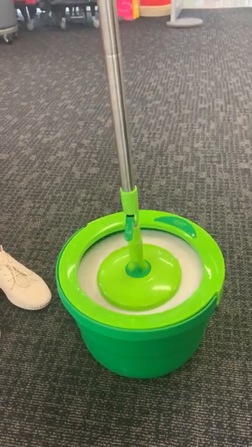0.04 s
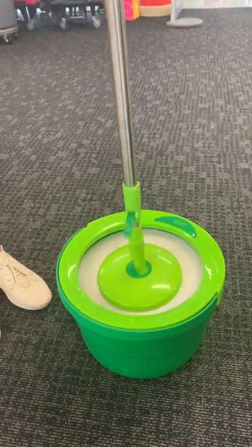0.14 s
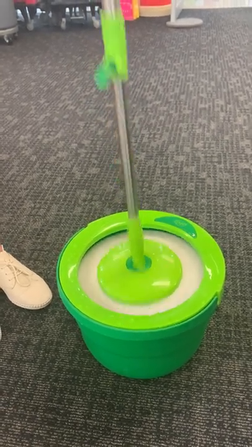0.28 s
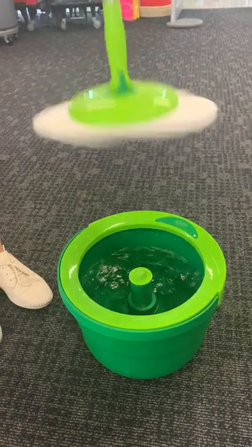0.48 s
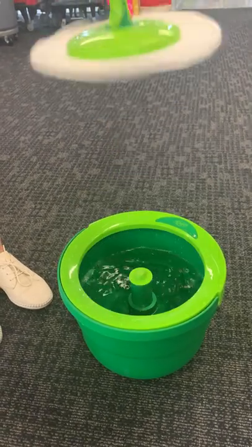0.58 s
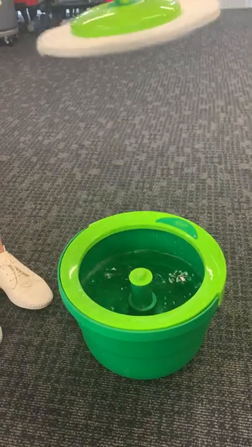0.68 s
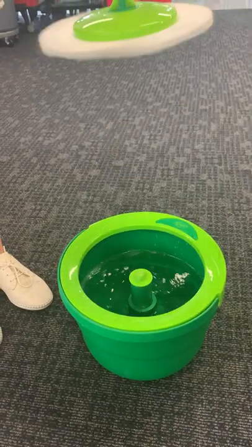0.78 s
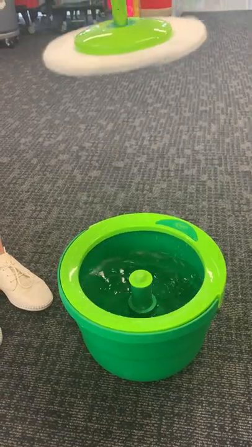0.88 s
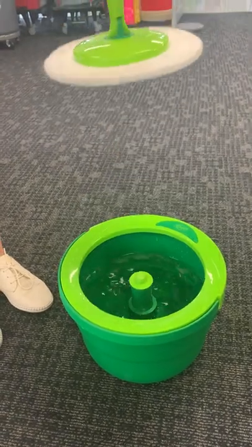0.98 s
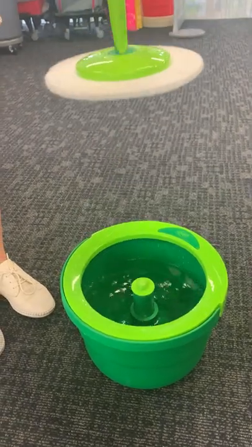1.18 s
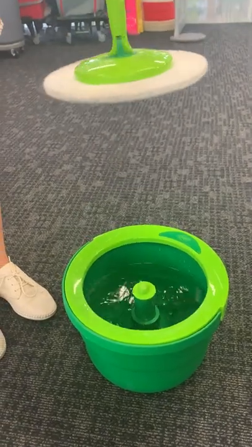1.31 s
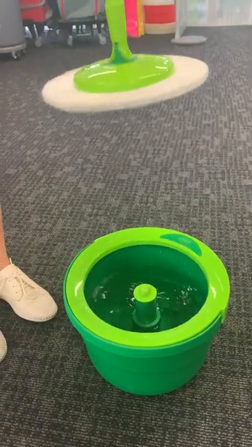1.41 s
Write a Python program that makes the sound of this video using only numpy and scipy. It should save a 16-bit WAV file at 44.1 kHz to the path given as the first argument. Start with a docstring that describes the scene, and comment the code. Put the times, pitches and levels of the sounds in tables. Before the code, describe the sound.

Spin mop whirring and churning water, with one sharp handle clack and faint dripping afterwards.

```python
"""A carpeted room, a pair of microphones close in front of a plastic bucket of water.
A spin mop is drawn up: its head whirs and churns the water while the telescopic handle slides out,
rubbing and rattling, and hits its stop with a sharp clack. The head leaves its post with a thud,
whirs on and drips into the bucket. Further off, the raised handle knocks a few times.
The room hums low throughout."""
import sys
import numpy as np
from scipy import signal
from scipy.fft import rfft, irfft, next_fast_len
from scipy.io import wavfile

SR = 44100
rng = np.random.default_rng(int(sys.argv[2]) if len(sys.argv) > 2 else 0)


def dump_mix(stems):
    """Bounce the given channels to the path in sys.argv[1] as a 16-bit WAV at rate SR."""
    frames = np.atleast_2d(stems).T  # one column per channel
    limited = np.clip(frames, -1, 1)  # hard clip at full scale
    pcm = np.round(limited * 32767).astype(np.int16)
    wavfile.write(sys.argv[1], SR, pcm)


N = 63945
TIME = np.arange(N) / SR
SIZE = next_fast_len(2 * N)
FREQS = np.maximum(np.arange(SIZE // 2 + 1) * SR / SIZE, 1)


def from_db(db):
    """Decibels to gain."""
    return 10 ** (np.asarray(db) / 20)


def at_hz(points, hz):
    """Read a curve on a log-frequency axis."""
    freqs, values = np.transpose(points)
    return np.interp(np.log(hz), np.log(freqs), values)


def level(curve):
    """Gain over time from (time [s], level [dB]) points."""
    return from_db(np.interp(TIME, *np.transpose(curve)))


def drift(rate_hz):
    """Random wander with a spread of 1, mostly slower than rate_hz."""
    slow = irfft(rfft(rng.standard_normal(SIZE)) / (1 + (FREQS / rate_hz) ** 2), SIZE)
    return slow[:N] / slow.std()


def colour(x, spectrum):
    """Causal (minimum-phase) filter with the given gains."""
    cepstrum = irfft(np.log(from_db(at_hz(spectrum, FREQS))), SIZE)
    cepstrum[1:SIZE // 2] *= 2
    cepstrum[SIZE // 2 + 1:] = 0
    return irfft(rfft(x, SIZE) * np.exp(rfft(cepstrum)), SIZE)[:N]


def bursts(times, dbs, decay_s, rise_s=1 / SR):
    """Each contact is a fast-dying burst of micro-impacts; a glancing one swells first."""
    ages = [np.maximum(TIME - at, 0) for at in times]
    power = sum((from_db(db) * (1 - np.exp(-age / rise_s)) * np.exp(-age / decay_s)) ** 2
                for age, db in zip(ages, dbs))
    return np.sqrt(power) * rng.choice([-1, 1], N)


def strike(times, dbs, modes, vary_db=0):
    """Blows set the modes ringing, varied by vary_db; nothing radiates far below the lowest."""
    ring = np.zeros(N)
    for at, db in zip(times, dbs):
        age = np.maximum(TIME - at, 0)
        for (hz, mode_db, t60), chance in zip(modes, rng.standard_normal(len(modes))):
            envelope = from_db(db + mode_db + vary_db * chance) * np.exp(-np.log(1000) * age / t60)
            ring += envelope * np.sin(2 * np.pi * hz * age)
    low_cut = signal.butter(3, .75 * modes[0][0], "high", fs=SR, output="sos")
    return signal.sosfilt(low_cut, ring + 1e-18)


# Hum of the room: (frequency [Hz], level [dB])
HUM_TONES = [(65.8, -46.5), (132, -60)]
# Air all round the microphones: (frequency [Hz], gain [dB])
AIR_SPECTRUM = [(20, -45), (45, -34), (70, -27), (110, -33), (200, -44), (380, -60.5), (800, -49.5),
                (1300, -60), (3000, -65.5), (8000, -66.5), (15000, -99)]

def room_tone():
    """A low wavering hum from the front, over the diffuse air of the room."""
    hum = sum(from_db(db + 1.3 * drift(2)) * np.sin(2 * np.pi * hz * TIME + .16 * drift(4))
              for hz, db in HUM_TONES)
    return microphones(hum) + room(colour(rng.standard_normal(N), AIR_SPECTRUM))


# Close hiss of the sliding handle, then of the spinning head: (time [s], level [dB])
WHIR_LEVELS = [(0, -9), (.06, -9.5), (.11, -11), (.155, 0.5), (.19, 2.5), (.22, -2.5), (.29, -2.5),
               (.33, -22), (.38, -29), (.41, -4), (.44, -13.5), (.56, -18.5), (.74, -18), (.85, -21.5),
               (.95, -20.5), (1.0, -22), (1.09, -17.5), (1.15, -34), (1.19, -17), (1.23, -25.5),
               (1.3, -24.5), (1.33, -35), (1.365, -17), (1.4, -33), (1.45, -33)]
# Tone of that hiss: (frequency [Hz], gain [dB])
WHIR_SPECTRUM = [(100, -63), (420, -35.5), (1400, -31.5), (2200, -42.5), (3500, -37.5), (5200, -32.5),
                 (6500, -34.5), (8300, -27.5), (11000, -37.5), (15000, -36)]

def whir(mean_flutter_hz=21.8, flutter_db=1.8, grain_db=2):
    """Grainy friction hiss that flutters unevenly as the head turns."""
    turn = np.sin(2 * np.pi * np.cumsum(mean_flutter_hz * (1 + drift(2.8))) / SR)
    friction = rng.standard_normal(N) * from_db(flutter_db * turn + grain_db * drift(250) - 3.5)
    return colour(friction * level(WHIR_LEVELS), WHIR_SPECTRUM)


# Water stirred just in front of the microphones: (time [s], level [dB])
CHURN_LEVELS = [(0, 9.5), (.11, -4), (.22, -2), (.3, 2.5), (.38, -6), (.42, -3), (.49, -13), (.6, -19),
                (.95, -52), (1.45, -28.5)]
# Tone of the slosh: (frequency [Hz], gain [dB])
CHURN_SPECTRUM = [(40, -40), (100, -16.5), (200, -28), (350, -25.5), (520, -31.5), (780, -32), (1300, -36),
                  (2200, -38.5), (5000, -47.5)]

def churn():
    """Lumpy slosh of the stirred water, settling once the head is out."""
    slosh = rng.standard_normal(N) * level(CHURN_LEVELS)
    lumps = from_db(2.9 * drift(50) - 2)
    return colour(slosh * lumps, CHURN_SPECTRUM)


# Modes of the handle's tubes: (frequency [Hz], level [dB], t60 [s])
TUBE_RING = [(360, -41, 0.03), (758, -49, 0.03), (1230, -38, 0.03), (1350, -35, 0.03), (3194, -53, 0.04)]

def rub(swell_db=21, swell_s=.0091):
    """The sliding tubes keep their modes humming, scraping harder just before the stop."""
    until_stop = np.maximum(STOP_HITS[0][0] - TIME, 0)
    pressure = (until_stop > 0) * (1 + from_db(swell_db) * np.exp(-until_stop / swell_s))
    friction = pressure * rng.standard_normal(N)
    return from_db(-31.5) * signal.fftconvolve(friction, strike([0], [0], TUBE_RING))[:N]


# Loose tubes touching, close up: (time [s], level [dB], tick level [dB])
TUBE_CONTACTS = [(.002, 6, -35), (.008, 6.5, -29), (0.035, -7.5, -28), (.066, -3.5, 2), (0.093, 3, -9),
                 (0.134, 4.5, -27), (0.147, 3.5, -23), (0.179, -2.5, -18), (0.193, -3.5, -4),
                 (.329, -8, -41), (.347, 0, -22), (0.3969, -1.5, -21), (0.4047, -2, 5.5), (.406, 6, -1),
                 (0.672, -26.5, -16)]
# Their dull rasp: (frequency [Hz], gain [dB])
RASP_SPECTRUM = [(100, -13), (330, -18.5), (600, -37), (1000, -21.5), (1320, -18), (1750, -22),
                 (3500, -29.5), (6000, -34.5), (15000, -60.5)]
# Bright tick of a contact on the handle: (frequency [Hz], gain [dB])
TICK_SPECTRUM = [(500, -49), (3500, -21.5), (5000, -30), (7500, -25.5), (10000, -33), (15000, -36.5)]

def rattles(rise_s=.002):
    """The tubes graze each other: a short ring, a dull rasp and a bright tick."""
    times, dbs, tick_dbs = np.transpose(TUBE_CONTACTS)
    ring = strike(times + rise_s, dbs, TUBE_RING, vary_db=-2)
    rasp = colour(bursts(times, dbs, decay_s=.0033, rise_s=rise_s), RASP_SPECTRUM)
    tick = colour(bursts(times, tick_dbs, decay_s=.001), TICK_SPECTRUM)
    return ring + rasp + tick


def along_tube(x, travel_at_1khz_s=.0016):
    """Bending waves run down the tube, the treble arriving before the bass."""
    phase = 4 * np.pi * travel_at_1khz_s * np.sqrt(1000 * FREQS)
    return irfft(rfft(x, SIZE) * np.exp(-1j * phase), SIZE)[:N]


# The handle's hit and rebound at its stop, close up: (time [s], level [dB])
STOP_HITS = [(.249, -0.5), (0.254, -4.5)]
# Crack of each hit: (frequency [Hz], gain [dB])
CRACK_SPECTRUM = [(130, -32.5), (400, 5.5), (750, -0.5), (1500, -0.5), (3300, 3.5), (4700, -2.5),
                  (6500, -3.5), (9000, -5.5), (11500, -7), (15000, -14.5)]
# Modes of the whole mop: (frequency [Hz], level [dB], t60 [s])
MOP_RING = [(330, -4.5, 0.04), (537, -5.5, 0.046), (790, -15, 0.04), (1415, -23, 0.06), (1980, -22, 0.046),
            (2220, -20, 0.06), (2810, -22, .04)]

def clack(body_lag_s=.0022):
    """The handle hits its stop and the mop rings; hit and rebound each send a crack down the tube."""
    times, dbs = np.transpose(STOP_HITS)
    body = strike(times[:1] + body_lag_s, dbs[:1], MOP_RING, vary_db=.8)
    cracks = colour(bursts(times, dbs, decay_s=.0025), CRACK_SPECTRUM)
    return body + along_tube(cracks)


# The head bumps the bucket on its way out, close up: (time [s], level [dB])
BUCKET_BUMPS = [(0.2779, 0.5), (0.2863, -10), (.301, -8.5), (0.409, -25.5)]
# Modes of the bucket: (frequency [Hz], level [dB], t60 [s])
BUCKET_RING = [(108, -18, 0.096), (163, -17.5, 0.046), (261, -26.5, 0.088)]

def thud():
    """The bucket booms briefly as the head leaves its post."""
    times, dbs = np.transpose(BUCKET_BUMPS)
    return strike(times, dbs, BUCKET_RING, vary_db=.8)


def bubble(at, db, hz, decay_s, rise_per_s=3.46):
    """An air bubble rings and rises in pitch."""
    age = np.maximum(TIME - at, 0)
    envelope = from_db(db) * (1 - np.exp(-age * hz)) * np.exp(-age / decay_s)
    return envelope * np.sin(2 * np.pi * hz * age * (1 + rise_per_s * age / 2))


# Plops near the microphones; the first rings out with the handle's rattle, the rest fall in the bucket: (time
# [s], level [dB], pitch [Hz])
WATER_PLOPS = [(.349, -27, 787), (.513, -33.5, 723), (.535, -34, 732), (.594, -36.5, 690),
               (.655, -42.5, 730), (.868, -44.5, 822), (1.255, -47, 772)]
# Splash of each plop: (frequency [Hz], gain [dB])
SPLASH_SPECTRUM = [(300, -22), (780, -12), (1100, -9), (1700, -14), (3000, -20)]

def drips(head_out_s=.47, drips_per_s=90, drain_db_per_s=7, plop_decay_s=.00454):
    """A few splashy plops among small random drips from the lifted head, fading as it drains."""
    gaps, pitches, faintness = rng.random((300, 3)).T
    drained_s = np.cumsum(-np.log(gaps)) / drips_per_s
    drip_dbs = -49 - 20 * faintness - drain_db_per_s * drained_s
    drip_hz = 720 * 2 ** (1.5 * pitches ** 2)  # 1.5 octaves, favouring the low end
    small = sum(bubble(at, db, hz, decay_s=2.5 / hz)
                for at, db, hz in zip(head_out_s + drained_s, drip_dbs, drip_hz) if at < TIME[-1])
    times, dbs, _ = np.transpose(WATER_PLOPS)
    splash = colour(bursts(times, dbs - 6, 2 * plop_decay_s), SPLASH_SPECTRUM)
    plops = sum(bubble(at, db, hz, plop_decay_s) for at, db, hz in WATER_PLOPS)
    return small + splash + plops


# The raised handle knocks, further from the microphones:
# (time [s], level [dB], decay [s], brightness [dB], ring level [dB], pitch [ratio])
HANDLE_KNOCKS = [(.405, 0, 0.005, -19, 2, 1), (1.0119, -4, 0.0089, -8.5, -14, 0.83),
                 (1.019, -6, 0.0036, 4.5, -1.5, 1), (1.115, -12, 0.0089, -21, -12.5, .9),
                 (1.357, -14.5, 0.007, -9, -19, 0.85)]
# Dull part of a knock: (frequency [Hz], gain [dB])
KNOCK_SPECTRUM = [(90, -48), (230, -20.5), (380, -17), (550, -23.5), (800, -21), (1300, -21), (2000, -28),
                  (3400, -35.5), (5000, -55), (12000, -54)]
# Modes of the raised handle at pitch ratio 1: (frequency [Hz], level [dB], t60 [s])
HANDLE_RING = [(225, -44, 0.08), (285, -33, 0.04), (385, -44, 0.07), (764, -42, 0.08), (824, -43, 0.08),
               (1227, -40, 0.1)]

def knocks():
    """Hollow plastic knocks of the raised handle, varying in pitch; some dull, some with a bright tick."""
    dull = sum(bursts([at], [db], decay_s) for at, db, decay_s, *_ in HANDLE_KNOCKS)
    ticks = sum(bursts([at], [db + bright_db - 7], decay_s)
                for at, db, decay_s, bright_db, *_ in HANDLE_KNOCKS)
    body = sum(strike([at], [ring_db], np.array(HANDLE_RING) * [pitch, 1, 1])
               for at, *_, ring_db, pitch in HANDLE_KNOCKS)
    return colour(dull, KNOCK_SPECTRUM) + colour(ticks, TICK_SPECTRUM) + body


# Decay of the carpeted room: (frequency [Hz], t60 [s])
ROOM_DECAY = [(100, 0.28), (1500, 0.15), (14000, 0.11)]

def room(x, build_s=.0017, alike_below_hz=370):
    """Diffuse tail that dies faster in the treble and is alike at both microphones only in the bass."""
    mid, side = rfft(rng.standard_normal((2, SIZE)))
    alike = 1 / (1 + (FREQS / alike_below_hz) ** 4)
    noise = np.sqrt(1 + alike) * mid + np.sqrt(1 - alike) * side * np.array([[1], [-1]])
    tail = np.zeros((2, N))
    for low_hz in 22 * 2.0 ** np.arange(10):
        octave = irfft(noise * ((FREQS >= low_hz) & (FREQS < 2 * low_hz)), SIZE)[:, :N]
        t60 = at_hz(ROOM_DECAY, low_hz * np.sqrt(2))
        tail += octave * np.exp(-np.log(1000) * TIME / t60)
    tail *= 1 - np.exp(-TIME / build_s)
    tail /= np.sqrt(np.sum(tail ** 2) / 2)
    return signal.fftconvolve(x[None], tail, axes=1)[:, :N]


# Phase between the microphones: (frequency [Hz], lead of the left [rad])
MIC_PHASE = [(300, .1), (720, .5), (1300, -.3), (2200, .5), (2670, 2.9), (3700, 1.1), (4900, 3.0),
             (5800, 3.8), (7000, 5.6), (9700, 7.1), (12400, 9.4), (15800, 12.4)]
# Their balance: (frequency [Hz], left minus right [dB])
MIC_BALANCE = [(60, -0.87), (600, -2), (1300, 0.23), (8000, 1)]

def microphones(x):
    """A source in front reaches the two microphones with a phase and level difference."""
    left = np.exp(.5j * at_hz(MIC_PHASE, FREQS)) * from_db(at_hz(MIC_BALANCE, FREQS) / 2)
    return irfft(rfft(x, SIZE) * np.array([left, 1 / left]), SIZE)[:, :N]


def scene():
    """Mop and bucket close in front; the raised handle further off, with much more of the room."""
    near = whir() + rub() + churn() + clack() + thud() + rattles() + drips()
    far = knocks()
    reverb = room(from_db(-12.5) * near + from_db(2.5) * far)
    direct = microphones(near) + far * from_db([[-2.5], [-1.5]])
    return direct + reverb + room_tone()


def record(dry, ceiling=.9, cutoff_hz=16000):
    """Behind the microphones, the highest peak is rounded and the top is cut steeply."""
    rounded = ceiling * dry / (ceiling ** 6 + dry ** 6) ** (1 / 6)
    return signal.sosfilt(signal.ellip(10, .1, 80, cutoff_hz, fs=SR, output="sos"), rounded)


dry = scene()
out = record(dry)
dump_mix(out)
```